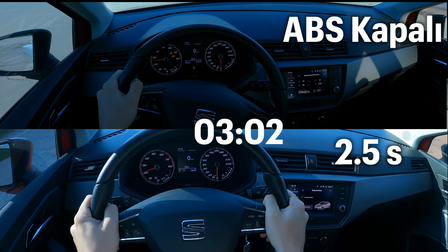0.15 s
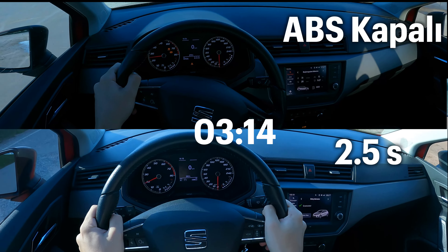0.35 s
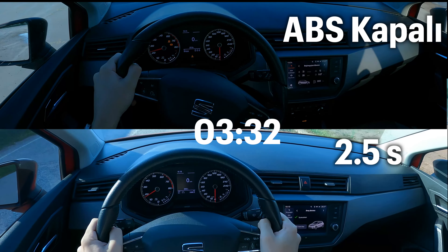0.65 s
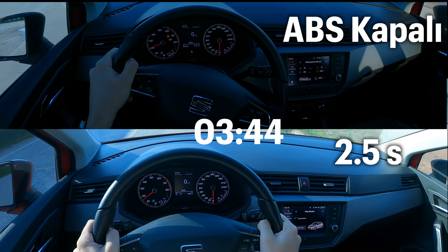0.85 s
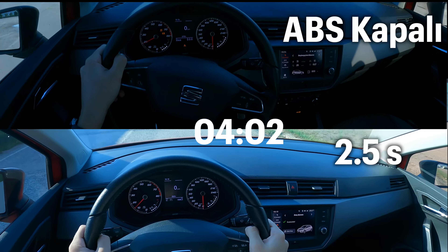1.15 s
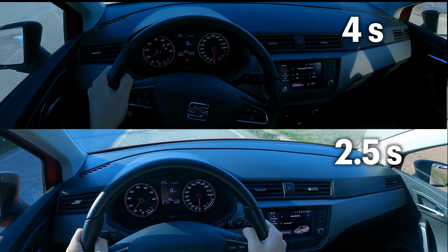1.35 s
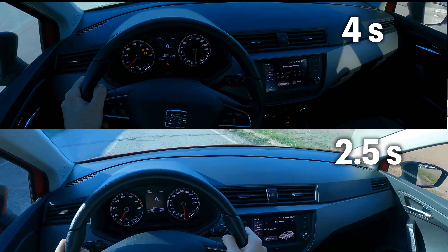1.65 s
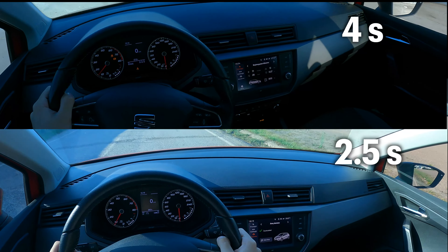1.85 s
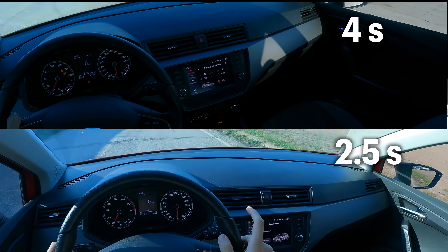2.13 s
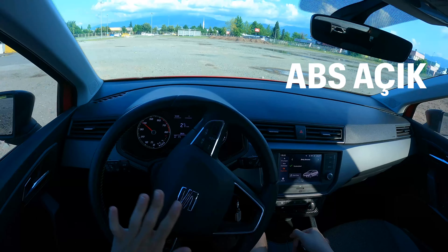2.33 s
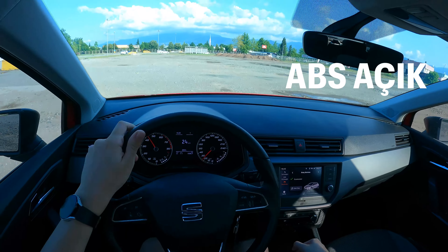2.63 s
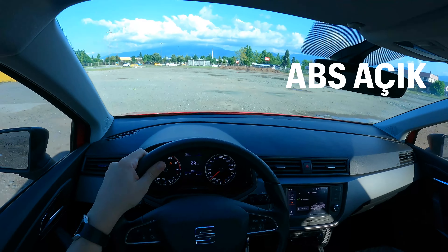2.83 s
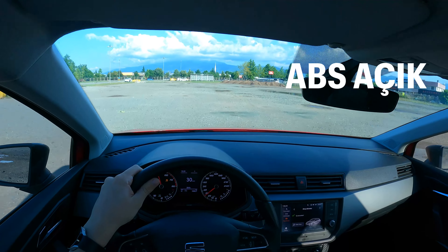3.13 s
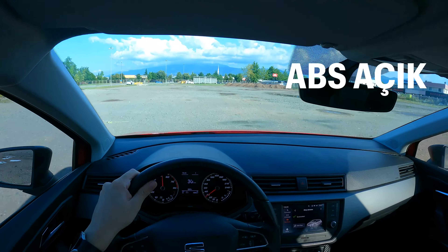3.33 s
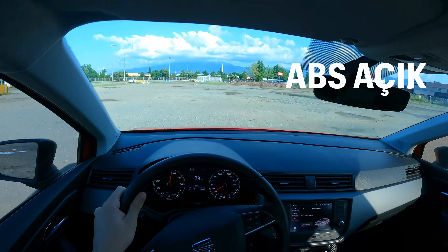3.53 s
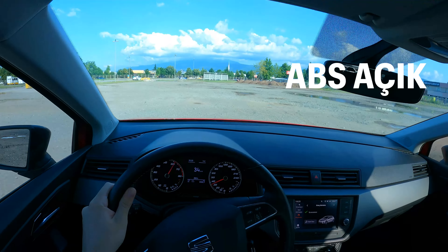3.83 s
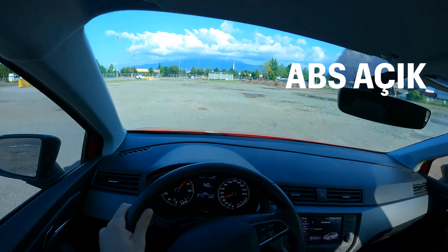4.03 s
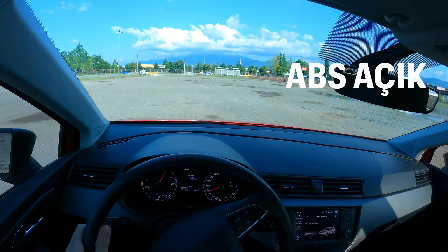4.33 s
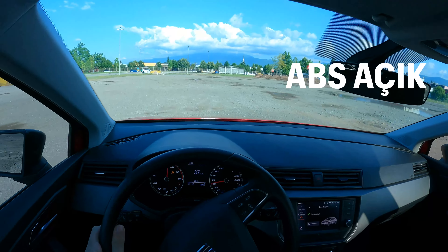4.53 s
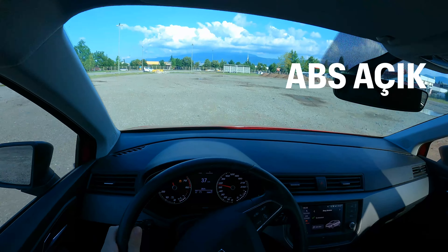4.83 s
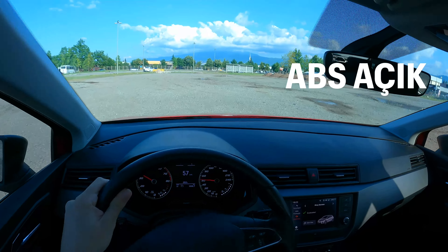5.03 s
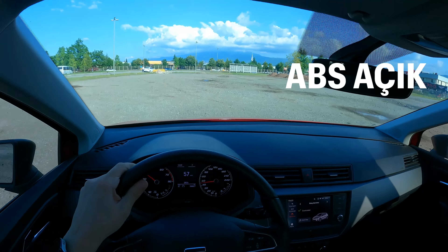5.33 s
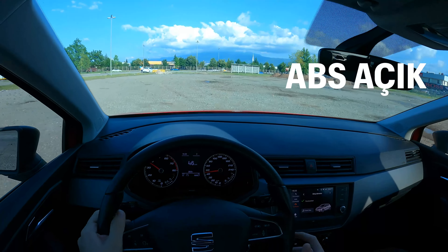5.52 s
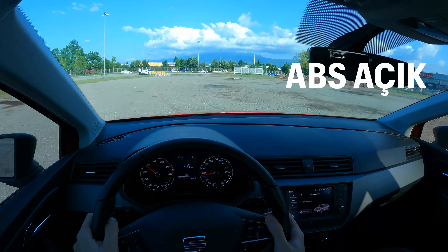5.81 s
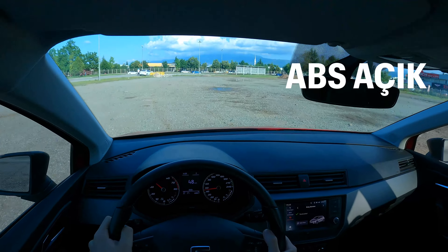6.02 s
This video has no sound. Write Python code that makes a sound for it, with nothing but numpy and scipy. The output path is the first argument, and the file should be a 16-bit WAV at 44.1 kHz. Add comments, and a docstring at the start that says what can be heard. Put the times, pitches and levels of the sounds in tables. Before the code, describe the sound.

Close cabin microphone, slightly stronger on the left. First a soft low rolling noise with broken squeals, faint sand crunch and a small engine sagging into a shaky idle with slight trim buzz. Then a sharp cut to a much louder ride: heavy low rumble, rising engine growl, rattling plastic, a roaring rough patch with drumming stones, then coasting with a few hard knocks.

```python
"""A small three-cylinder car pulls away over rough paving, heard from the driver's seat: its crankshaft orders
sweep through cabin resonances while the cabin booms, trim rattles and grit sprays into the wheel arches.
Before it a like car ends a locked-wheel skid: stick-slip squeals and rubber scrub over soft rolling noise,
while its engine is dragged down through the resonance of its mounts to idle.
Orders and squeals are sines, rolling and rubbing are filtered noise, and strikes are decaying noise bursts."""
import sys
import numpy as np
from scipy import signal
from scipy.fft import rfft, irfft
from scipy.io import wavfile
from scipy.ndimage import uniform_filter1d, minimum_filter1d

SR = 44100
rng = np.random.default_rng(int(sys.argv[2]) if len(sys.argv) > 2 else 0)


def pcm_store(signal):
    """Save signal as 16-bit PCM."""
    levels = np.round(np.clip(np.atleast_2d(signal), -1, 1) * 32767)
    wavfile.write(sys.argv[1], SR, levels.astype(np.int16).T)


N = 272077
T = np.arange(N) / SR
HZ = np.fft.rfftfreq(N, 1 / SR)
LAUNCH_S = 2.37  # the fast ride takes over and the throttle opens

# speed of the pulling engine's crankshaft: time_s, turns_per_s
CRANK_SPEED = [(1.2, 27.1), (1.9, 30.9), (2.4, 34.3), (2.55, 36.4), (2.7, 37.35), (2.88, 38.05), (3, 38.85),
               (3.3, 43.4), (3.7, 48.4), (3.9, 52.05), (4.08, 54), (5.5, 44.9), (6.17, 40.8)]
# spectrum of sand under the tread: frequency_hz, relative_density_db
SAND_SPECTRUM = [(1500, -5.5), (2400, 2.5), (3500, -2), (5500, -6), (7300, -11.5), (8800, -22),
                 (13000, -28)]


def amp(db):
    """Level law: decibels become an amplitude ratio."""
    return 10 ** (np.asarray(db) / 20)


def unit(x):
    """Normalization: mean power, and so rms, becomes 1."""
    return x / np.sqrt(np.mean(x ** 2) + 1e-20)


def curves(rows):
    """Linear interpolation: each column of a timed table, sample by sample."""
    s, *columns = np.transpose(rows)
    return [np.interp(T, s, c) for c in columns]


def read(points, hz):
    """Logarithmic frequency scale: a spectrum is interpolated along it."""
    f, value = np.transpose(points)
    return np.interp(np.log(hz + 1), np.log(f + 1), value)


def hump(s, half_s):
    """Gaussian envelope: a smooth swell of height 1, down to 1/e half_s from its peak."""
    return np.exp(-((T - s) / half_s) ** 2)


def step(s, fade_s):
    """Sigmoid transition: rises smoothly from 0 to 1 around a moment."""
    return .5 + .5 * np.tanh((T - s) / fade_s)


def launched():
    """Crossfade: rises from 0 to 1 as the fast ride takes over."""
    return step(LAUNCH_S, fade_s=0.014)


def drift(rate_hz):
    """Low-pass filtered chance: slow random wandering of rms 1."""
    return unit(irfft(rfft(rng.standard_normal(N)) / (1 + (HZ / rate_hz) ** 4), N))


def colour(x, spectrum):
    """Spectral shaping and interaural coherence: filters a stereo pair and makes its bass nearly mono."""
    # likeness of the two ears: frequency_hz, coherence
    coherence = [(100, 0.999), (350, 0.94), (700, 0.78), (1500, 0.57), (8000, 0.54)]
    a, b = rfft(x)
    same = np.clip(read(coherence, HZ), 0, 1)
    mid = a * np.sqrt(1 + same)
    side = b * np.sqrt(1 - same)
    skirt = np.maximum(HZ / spectrum[-1][0], 1) ** -4  # steep fall above the last point
    gain = skirt * amp(read(spectrum, HZ))
    return unit(irfft(np.array([mid + side, mid - side]) * gain, N))


def noise(spectrum):
    """Stationary random sound: steady stereo noise of a given colour and rms 1."""
    return colour(rng.standard_normal((2, N)), spectrum)


def grains(per_s, spread_db, ring_s):
    """Shot noise: random tiny impacts of uneven size, each a short burst of decaying energy."""
    struck = rng.random(N) < per_s / SR
    size = amp(spread_db * np.minimum(rng.exponential(1, N), 4)) * struck
    energy = signal.lfilter([1], [1, -np.exp(-1 / (ring_s * SR))], size ** 2)
    return np.sqrt(energy) * rng.standard_normal((2, N))


def blow(age, t60, rise_s):
    """Exponential decay: envelope of one impact by its age, falling 60 dB in t60 seconds."""
    age = np.maximum(age, 0)
    return (1 - np.exp(-age / rise_s)) * amp(-60 * np.minimum(age / t60, 3))


def lift(hz, mode_hz, width_hz, lift_db):
    """Resonance: decibels gained near a cabin mode."""
    return lift_db / (1 + (2 * (hz - mode_hz) / width_hz) ** 2)


def rolling():
    """Broadband rolling noise: soft tyre and fan sound in the cabin at low speed."""
    # course of the rolling noise: time_s, level_db before the offset below
    course = [(0, -39), (.2, -48.5), (.8, -46.5), (1.6, -49.5), (2.3, -47)]
    # its spectrum: frequency_hz, relative_density_db
    spectrum = [(20, 2), (105, -5.5), (160, -4), (210, -12.5), (320, -17.5), (480, -29.5), (600, -23),
                (820, -42.5), (1150, -34.5), (2000, -44.5), (2800, -57), (7000, -59), (9000, -72)]
    offset_db = 12
    level_db, = curves(course)
    return amp(level_db + offset_db) * noise(spectrum)


def road():
    """Forced vibration: rough paving rocks the body at its lowest mode, booms and crackles under the tread."""
    # rocking of the body: time_s, level_db
    rocking = [(2.4, -19.5), (3.3, -7.5), (3.6, -20), (4.4, -14.5), (6.17, -17.5)]
    # rough patches under the wheels: centre_s, half_length_s, extra_boom_db, extra_roar_db
    patches = [(2.476, 0.067, -1, 7), (4.475, 0.22, 4.5, 2.5), (4.72, 0.23, 4, 11.5), (5.571, 0.11, 9, 2.5)]
    # spectra of body heave, cabin boom and tyre roar: frequency_hz, relative_density_db
    heave_spectrum = [(12, -25.5), (29, 17), (45, -1.5), (75, -11.5)]
    boom_spectrum = [(35, -16.5), (60, 0.5), (80, -1.5), (102, 2), (135, -7), (185, -14.5), (260, -25),
                     (450, -52)]
    roar_spectrum = [(150, -3.5), (230, -2.5), (350, 2), (490, -8), (620, -6.5), (820, -13.5), (1400, -15),
                     (2000, -26.5), (2800, -41.5)]
    sway_hz, sway_db, heave_db = 28, -3, -1  # levels relative to the rocking
    boom_db, roar_db, roar_at_turns_per_s, roar_db_per_doubling = -20.5, -40, 45.4, 6
    lumps_db, sand_db = 1.5, -23.0  # unevenness of the roar; sand relative to it

    rocking_db, = curves(rocking)
    turns_per_s, = curves(CRANK_SPEED)
    sway_rate = sway_hz * (1 + 0.11 * drift(4.35))
    sway = np.sqrt(2) * np.sin(2 * np.pi * np.cumsum(sway_rate) / SR)
    body = amp(rocking_db) * (amp(sway_db) * sway + amp(heave_db) * noise(heave_spectrum))

    boom_course = boom_db + sum(db * hump(s, half_s) for s, half_s, db, _ in patches)
    cabin = amp(boom_course) * noise(boom_spectrum)

    roar_course = roar_db + roar_db_per_doubling * np.log2(turns_per_s / roar_at_turns_per_s)
    roar_course = roar_course + sum(db * hump(s, half_s) for s, half_s, _, db in patches)
    scrub = amp(roar_course + lumps_db * drift(9.7))
    sand = colour(grains(per_s=1500, spread_db=2.6, ring_s=.004), SAND_SPECTRUM)
    return body + cabin + scrub * (noise(roar_spectrum) + amp(sand_db) * sand)


def grit():
    """Impact excitation: sprayed stones drum on the wheel arches, ringing changing spots of the panels."""
    # sprays of grit: start_s, level_db
    sprays = [(4.549, -23.5), (4.587, -28.5), (4.635, -31.5), (4.682, -21.5), (4.738, -26), (4.767, -26.5),
              (4.791, -27)]
    # spectrum of the stones: frequency_hz, relative_density_db
    spectrum = [(400, 6.5), (800, 1.5), (1700, -4.5), (2500, -9), (4500, -20.5), (7300, -29), (9000, -38),
                (13000, -50)]
    streak_db = 4
    stones = colour(grains(per_s=1100, spread_db=4, ring_s=.003), spectrum)
    z = signal.stft(stones, nperseg=512)[2]
    # random gain, smoothed over neighbouring frequencies and moments
    streaks = uniform_filter1d(rng.standard_normal(z.shape[1:]), size=3, axis=0)
    streaks = unit(uniform_filter1d(streaks, size=5, axis=1))
    ringing = unit(signal.istft(z * amp(streak_db * streaks))[1][:, :N])
    power = sum((amp(db) * blow(T - s, t60=0.27, rise_s=.005)) ** 2 for s, db in sprays)
    return ringing * np.sqrt(power)


def thuds():
    """Damped free vibration: bumps ring the suspension and the floor pan."""
    # thuds: start_s, level_db, pitch_hz
    bumps = [(3.991, -28.5, 347), (4.164, -28, 316), (4.236, -28.5, 304), (4.434, -34.5, 670),
             (4.467, -27, 580), (4.692, -22, 347), (5.55, -21, 189)]
    out = np.zeros((2, N))
    for s, db, hz in bumps:
        spectrum = [(hz / 2, -10), (hz, 0), (hz * 1.18, -6), (hz * 2, -16)]
        out += amp(db) * blow(T - s, t60=0.3, rise_s=0.0019) * noise(spectrum)
    return out


def light_rattles():
    """Poisson process: rows of faint strikes at random moments of the fast ride."""
    per_s, tick_db, knock_db, spread_db, ring_hz = 7, -59.5, -54, 7, 4230
    wait, tick, knock, pitch = rng.random((64, 4)).T
    times = LAUNCH_S + np.cumsum(-np.log(1 - wait)) / per_s
    tick_levels = tick_db + spread_db * (2 * tick - 1)
    knock_levels = knock_db + spread_db * (2 * knock - 1)
    rings = ring_hz * 2 ** (pitch - .5)
    return [row for row in zip(times, tick_levels, knock_levels, rings) if row[0] < T[-1]]


def rattles():
    """Modal response: each strike, a crack and a chatter of tick and knock, rings the modes of its own panel."""
    # loudest stone strikes and trim rattles: start_s, tick_db, knock_db (before the offsets below), ring_hz
    loud_strikes = [(.103, -54.5, -53, 4500), (0.129, -45, -39, 2800), (0.224, -45.5, -70, 7550),
                    (2.126, -48, -61, 4800), (2.18, -46, -50, 6640), (2.4214, -50.5, -51, 7500),
                    (2.4935, -47, -34.5, 2740), (2.713, -56, -40.5, 1200), (2.871, -44, -37.5, 1600),
                    (3.709, -60, -37.5, 1900), (3.822, -47, -41, 7100), (3.873, -46, -38, 3670),
                    (3.9888, -45.5, -38.5, 2720), (4.05, -41.5, -58, 5570), (4.1686, -39, -33.5, 2760),
                    (4.513, -44.5, -39, 3600), (5.136, -45.5, -37, 1850), (5.2102, -50, -63, 5800),
                    (5.284, -47, -40, 3400), (5.301, -55, -40, 1300), (5.35, -53.5, -50, 1400),
                    (5.5525, -47.5, -35, 1330), (5.591, -42.5, -46, 4580), (5.613, -40.5, -60, 3400),
                    (5.871, -66, -44, 1900)]
    # spectra of the bright tick and the hollow knock: frequency_hz, relative_density_db
    tick_spectrum = [(1200, -25), (3000, -10), (4200, -6), (7300, -12.5), (9000, -21.5), (13000, -28.5)]
    knock_spectrum = [(300, 7), (750, -1), (1550, -0.5), (2600, -12), (5000, -25.5)]
    tick_offset_db, knock_offset_db, chatter_db, tail_db = -5, 4, 2, -12
    ripple_db, ring_db, ring_octaves = 3.5, 4.5, 0.4
    size = 8192  # samples per strike

    sources = np.array([amp(tick_offset_db) * noise(tick_spectrum), amp(knock_offset_db) * noise(knock_spectrum)])
    ticks, knocks = amp(chatter_db * drift(200)) * sources
    hz = np.fft.rfftfreq(size, 1 / SR)
    out = np.zeros((2, N + size))
    age = np.arange(size) / SR
    crack = blow(age, t60=0.037, rise_s=.0004)
    envelope = crack + amp(tail_db) * blow(age, t60=0.23, rise_s=.004)
    for s, tick_db, knock_db, ring_hz in loud_strikes + light_rattles():
        at = int(s * SR) + np.arange(size)
        strike = envelope * (amp(tick_db) * ticks[:, at % N] + amp(knock_db) * knocks[:, at % N])
        # peaks and dips a few hundred Hz apart
        ripple = unit(signal.resample(rng.standard_normal(len(hz) // 48), len(hz)))
        ring = np.exp(-(np.log2((hz + 1) / ring_hz) / ring_octaves) ** 2)
        log_gain = np.log(unit(amp(ripple_db * ripple)) * amp(ring_db * ring))
        # minimum phase: the panel rings only after the strike
        mirrored = np.r_[log_gain, log_gain[-2:0:-1]]
        panel = np.exp(signal.hilbert(mirrored).conj())[:len(hz)]
        out[:, at] += irfft(rfft(strike) * panel, size)
    return out[:, :N]


def squeal(hz):
    """Stick-slip oscillation: tread blocks catch and slide unsteadily; a lower tread mode sings along."""
    jitter, flutter_db, low_mode_db, octave_db = 0.042, 2.0, -14, -24
    phase = 2 * np.pi * np.cumsum(hz * (1 + jitter * drift(210))) / SR
    tone = np.sin(phase)
    tone = tone + amp(low_mode_db) * np.sin(0.69 * phase + drift(90))
    tone = tone + amp(octave_db) * np.sin(2 * phase)
    return unit(tone * amp(flutter_db * drift(120)))


def tyre():
    """Dry friction: rubber scrubs to the end of the skid and squeals in bursts, over crunching sand."""
    # squeals: start_s, length_s, start_hz, end_hz, level_db
    squeals = [(-.03, 0.083, 1050, 843, -38), (0.046, 0.079, 981, 1032, -49),
               (0.121, 0.063, 1069, 950, -39), (0.186, 0.13, 1040, 983, -59),
               (0.481, 0.032, 1017, 1020, -52.5), (0.509, 0.058, 1060, 880, -55.5),
               (0.638, 0.03, 1033, 976, -56)]
    # spectrum of the scrub: frequency_hz, relative_density_db
    scrub_spectrum = [(300, -1.5), (1050, 9.5), (1400, -14), (3200, -17.5), (6000, -32), (9000, -35)]
    skid_end_s, scrub_db, scrub_fade_db_per_s = 0.17, -46.5, 198
    surge_s, surge_half_s, surge_db = 0.154, 0.016, 6  # one last surge of the scrub
    sand_db, sand_fade_db_per_s = -64.5, 22.5

    scrub_course = scrub_db + surge_db * hump(surge_s, surge_half_s)
    scrub_course = scrub_course - scrub_fade_db_per_s * np.maximum(T - skid_end_s, 0)
    out = amp(scrub_course) * noise(scrub_spectrum)
    out += amp(sand_db - sand_fade_db_per_s * T + 2 * drift(15)) * noise(SAND_SPECTRUM)
    for s, length_s, start_hz, end_hz, level_db in squeals:
        u = np.clip((T - s) / length_s, 0, 1)
        out += amp(level_db) * np.sin(np.pi * u) * squeal(start_hz + u * (end_hz - start_hz))
    return out


def braked_engine():
    """Sweep through resonance: slowing firing shakes the mounts, overtones cross cabin modes, trim buzzes."""
    # cabin modes that lift the overtones: mode_hz, width_hz, lift_db
    cabin_modes = [(66.4, 11, 22), (116.3, 22, 13)]
    # trim buzzes near the height of the shudder: centre_s, half_length_s, level_db
    buzzes = [(1.132, 0.059, -65), (1.356, 0.11, -63.5)]
    firing_hz, sag_hz_per_s, idle_hz = 56.04, 18.3, 26.2
    mount_hz, mount_width_hz, shudder_db = 35.1, 10.7, -17.5
    overtone_db, shaft_db = -53, -38

    hz = np.maximum(firing_hz - sag_hz_per_s * T, idle_hz)
    phase = 2 * np.pi * np.cumsum(hz) / SR
    # a steep, two-stage resonance
    detuning = (hz ** 2 - mount_hz ** 2) / (hz * mount_width_hz)
    mount_gain_db = -20 * np.log10(1 + detuning ** 2)
    hum = amp(shudder_db + mount_gain_db) * np.sin(phase)
    hum = hum + amp(shaft_db) * np.sin(phase * 2 / 3)  # three firings in two turns
    for k in range(2, 5):
        level_db = overtone_db + sum(lift(k * hz, *mode) for mode in cabin_modes)
        hum = hum + amp(level_db) * np.sin(k * phase + rng.uniform(0, 2 * np.pi))
    buzz = noise([(2000, 3.0), (3200, -10.0), (5000, 1.5), (7400, -7.5)])
    bursts = sum(amp(db) * hump(s, half_s) for s, half_s, db in buzzes)
    return np.sqrt(2) * hum + buzz * bursts


def pulling_engine():
    """Order tracking: crankshaft orders swell through cabin resonances and dull off the throttle; a whine follows."""
    # orders: multiple_of_crankshaft, full_throttle_db, mode_hz, width_hz, lift_db
    orders = [(4, -46, 133, 26, 14), (5, -50, 146, 26, 16), (6, -43, 207, 14, 11), (7, -51, 300, 55, 13),
              (8, -55, 365, 80, 11), (9, -48.5, 346, 46, 14.5), (10, -54, 500, 60, 3),
              (11, -58, 570, 60, 11), (12, -61, 603, 55, 16), (17, -65, 897, 45, 15),
              (26, -64, 1120, 210, 15)]
    lift_off_s, throttle_fade_s, coast_db_per_order = 4.17, 0.034, -1.14
    waver_db, smear_rad = 2.5, 0.75
    whine_order, whine_db, whine_hz, whine_width_hz = 153, -84, 6800, 900

    hz, = curves(CRANK_SPEED)
    phase = 2 * np.pi * np.cumsum(hz) / SR
    throttle = step(LAUNCH_S, throttle_fade_s) - step(lift_off_s, throttle_fade_s)
    # orders 13 to 16 form a dense stack under one resonance, with the same columns
    stack = [(k, -59, 610, 120, 7) for k in range(13, 17)]
    out = np.zeros(N)
    for order, db, *mode in orders + stack:
        heard = launched() if order > 7 else 1
        # uneven firing blurs mainly the high orders
        smear = smear_rad * (order / orders[-1][0]) ** 2 * drift(55)
        level_db = db + coast_db_per_order * order * (1 - throttle)
        level_db = level_db + lift(order * hz, *mode) + waver_db * drift(13)
        out += heard * amp(level_db) * np.sin(order * phase + smear + rng.uniform(0, 2 * np.pi))
    whine_course = whine_db - ((whine_order * hz - whine_hz) / whine_width_hz) ** 2 + 2 * drift(20)
    whine = amp(whine_course) * np.sin(whine_order * phase + drift(20)) * launched()
    return np.sqrt(2) * (out + whine)


def scene():
    """Superposition: the slow, braking car gives way to the fast ride; level differences lean it to the left."""
    # interaural level difference: frequency_hz, left_minus_right_db
    lean = [(40, 0.082), (300, 1.3), (1400, 3), (3000, 0.72), (6000, 1.8)]
    fast = launched()
    mix = (1 - fast) * (braked_engine() + rolling()) + fast * road()
    mix = mix + tyre() + pulling_engine() + grit() + rattles() + thuds()
    mix = mix * signal.windows.tukey(N, .002)  # soft start and end
    ears = amp(np.array([[.5], [-.5]]) * read(lean, HZ))
    return irfft(rfft(mix) * ears, N)


def record(dry):
    """Dynamic range limiting: a fast limiter holds down the bass; a low-pass filter then limits the band."""
    ceiling_db, split_hz, edge_hz = -9, 260, 14500
    bass = irfft(rfft(dry) / (1 + (HZ / split_hz) ** 4), N)
    allowed = np.minimum(1, amp(ceiling_db) / (abs(bass).max(0) + 1e-9))
    gain = uniform_filter1d(minimum_filter1d(allowed, size=900), size=900)
    low_pass = signal.firwin(511, edge_hz, window=("kaiser", 9), fs=SR)
    return signal.oaconvolve(dry + (gain - 1) * bass, low_pass[None], "same")


dry = scene()
out = record(dry)
pcm_store(out)
```